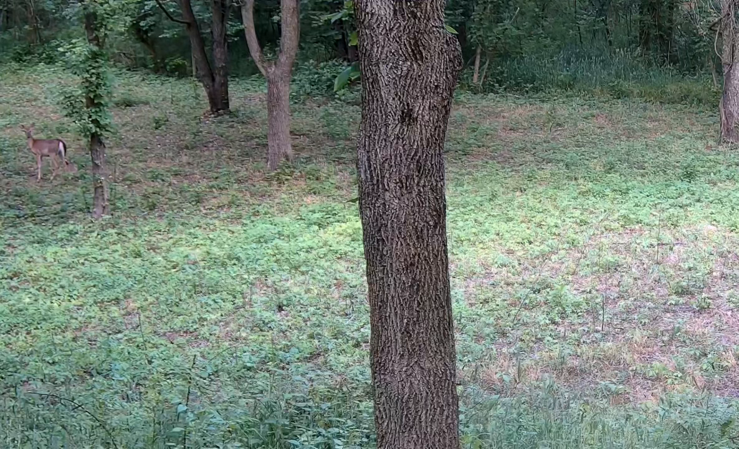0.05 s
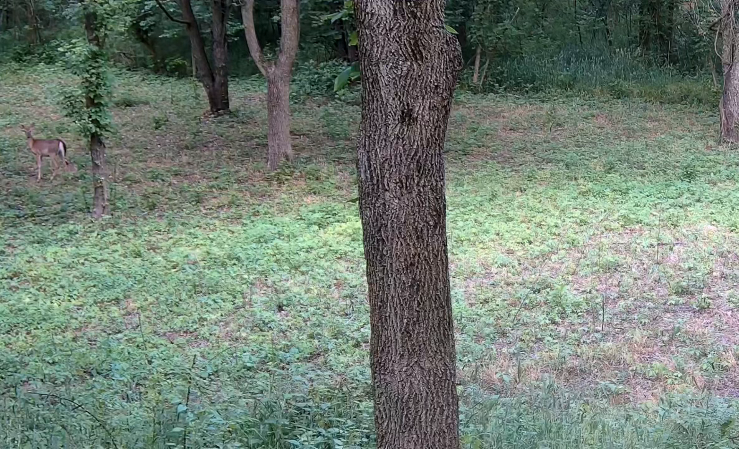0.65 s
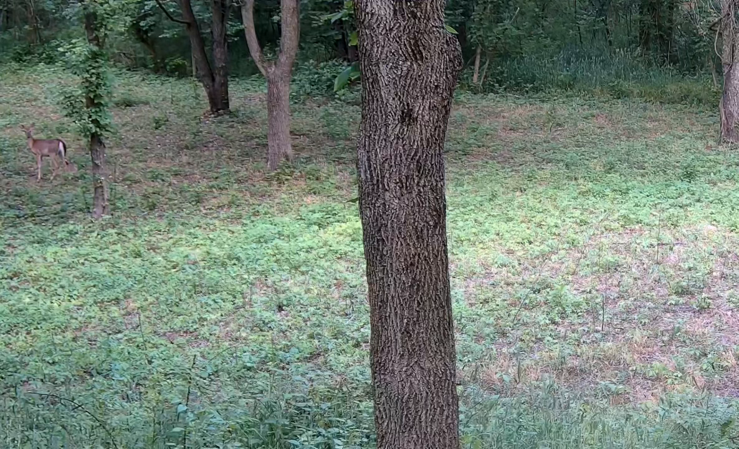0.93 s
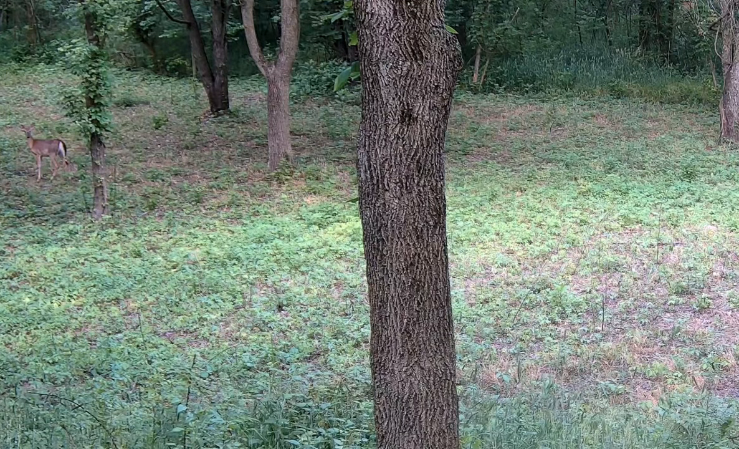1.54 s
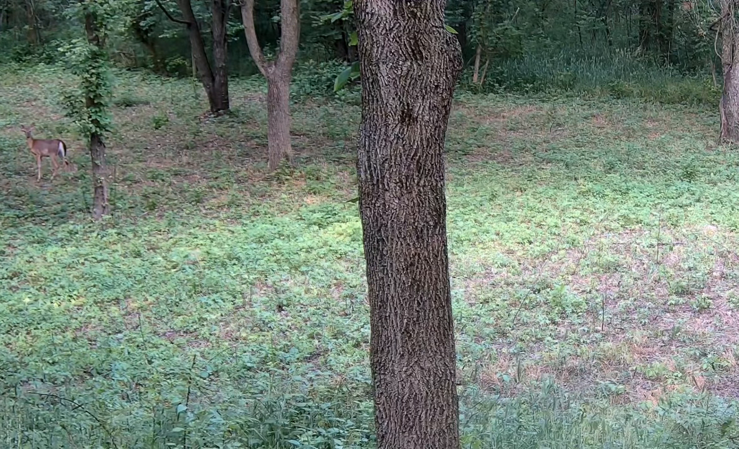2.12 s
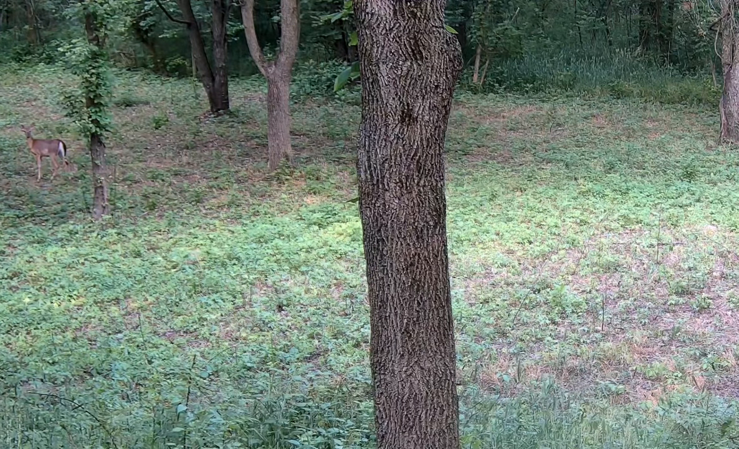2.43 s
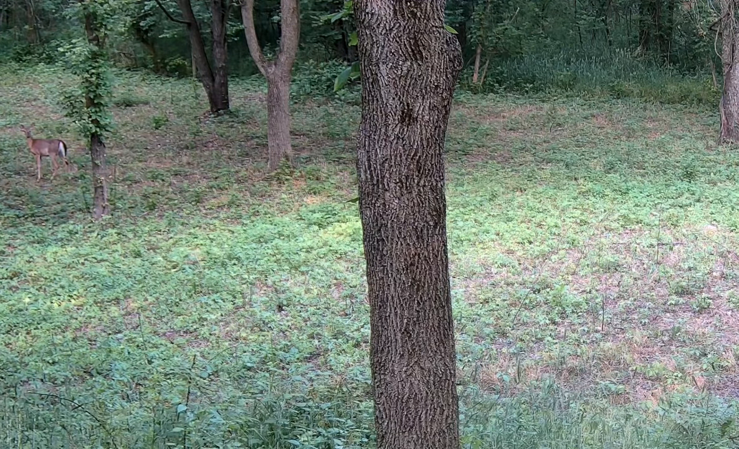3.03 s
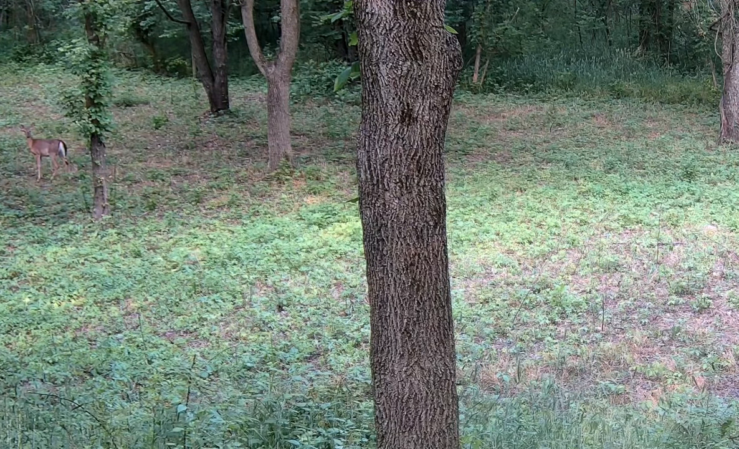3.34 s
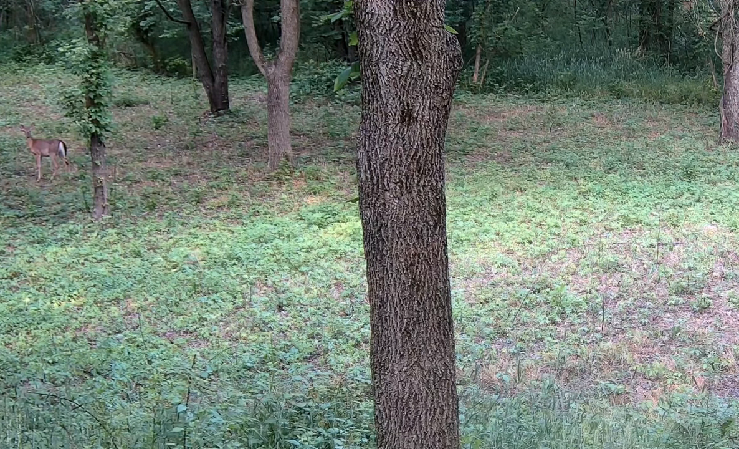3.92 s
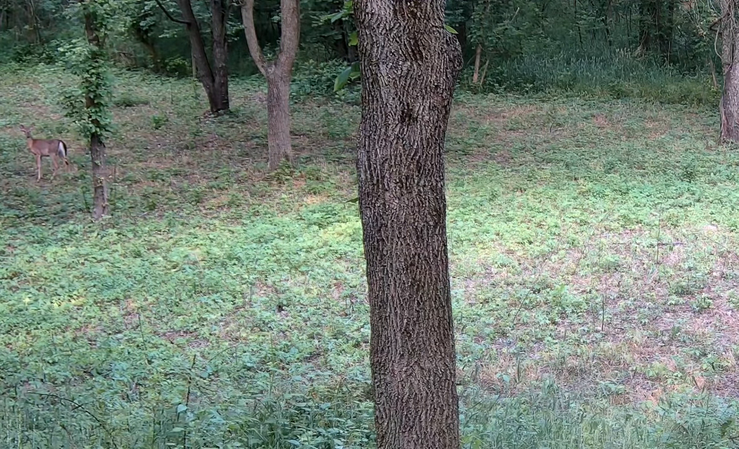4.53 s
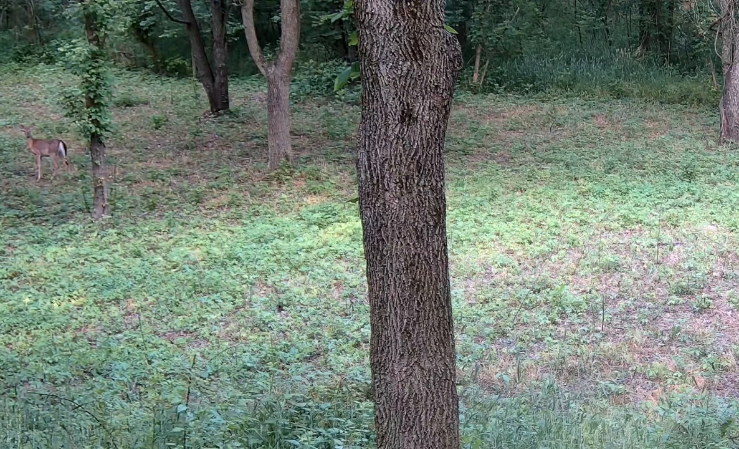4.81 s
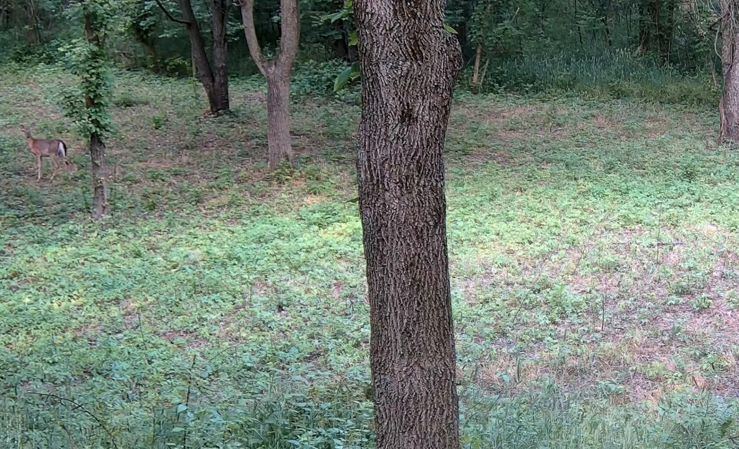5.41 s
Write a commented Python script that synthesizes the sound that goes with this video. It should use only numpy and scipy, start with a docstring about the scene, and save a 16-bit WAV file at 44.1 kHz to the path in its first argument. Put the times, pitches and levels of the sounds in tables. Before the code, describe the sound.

Two thin, nasal fawn bleats carry through quiet woods, among bird chirps, distant woodpecker drumming and a faint hum of traffic.

```python
"""A far woodpecker drums on a hollow limb; a dove coos and small birds chip and slur their notes.
Then the main voice: a fawn bleats twice across the woodland clearing, its vocal folds sounding
thin, nasal harmonics through the throat. A crow caws, and the trunks scatter every call.
Behind them are a thin trill, a stir of leaves, far machine hum and traffic, and the hiss of the woods."""
import sys
import numpy as np
from scipy import signal
from scipy.fft import rfft, irfft, next_fast_len
from scipy.io import wavfile
from scipy.ndimage import map_coordinates

SR = 44100
rng = np.random.default_rng(int(sys.argv[2]) if len(sys.argv) > 2 else 0)


def master_out(mix):
    """Clip the mix to full scale and print it as 16-bit PCM to the path in sys.argv[1]."""
    frames = np.transpose(np.atleast_2d(mix))
    ceiling = np.clip(frames, -1, 1)
    pcm = np.round(ceiling * 32767).astype(np.int16)
    wavfile.write(sys.argv[1], SR, pcm)


N = 245195


def amp(db):
    """Decibels to gain."""
    return 10 ** (np.asarray(db) / 20)


def unit(x):
    """x at rms 1."""
    return x / np.sqrt(np.mean(x ** 2) + 1e-20)


def along(points, hz):
    """Interpolate (freq_hz, value) points on a log frequency axis."""
    freqs, values = np.transpose(points)
    return np.interp(np.log(hz + 1), np.log(freqs + 1), values)


def curves(rows):
    """One per-sample curve for each column after time_s."""
    times, *columns = np.transpose(rows)
    return [np.interp(np.arange(N) / SR, times, column) for column in columns]


def gate(start_s, end_s, fade_s):
    """1 between two times, with soft edges."""
    t = np.arange(N) / SR
    inside_s = np.minimum(t - start_s, end_s - t)
    return np.sin(np.pi / 2 * np.clip(inside_s / fade_s + .5, 0, 1)) ** 2


def wobble(knots_per_s, size=N):
    """Smooth random curve."""
    knots = rng.standard_normal(int(size * knots_per_s / SR) + 4)
    return map_coordinates(knots, [np.arange(size) * knots_per_s / SR])


def phase(hz):
    """Running phase of a moving frequency."""
    return 2 * np.pi * np.cumsum(hz) / SR


def filtered(x, response):
    """Apply the gain response(hz) to x."""
    size = next_fast_len(N + SR // 2)
    return irfft(rfft(x, size) * response(np.fft.rfftfreq(size, 1 / SR)), size)[:N]


def noise(spectrum):
    """Noise of rms 1, coloured by (freq_hz, gain_db) points."""
    return unit(filtered(rng.standard_normal(N), lambda hz: amp(along(spectrum, hz))))


def add(track, start_s, sound):
    """Mix a sound into a track."""
    part = track[max(round(start_s * SR), 0):][:len(sound)]
    part += sound[:len(part)]


# nasal resonance: freq_hz, gain_db
NASAL_BAND = [(2500, -70), (3500, -35), (3690, 0), (3790, 0), (4000, -35), (6000, -70)]


def bleat(contour, throat, voice_break, full_effort_db=-47, break_length_s=.03, flutter_depth_db=3):
    """Vocal folds sound harmonics through the throat; effort brightens them, a break turns them hoarse."""
    pitch_hz, level_db, brightness_db = curves(contour)
    break_s, before, after = voice_break
    hoarse, = curves([(break_s - break_length_s / 2, before), (break_s + break_length_s / 2, after)])
    cycle = phase(pitch_hz * (1 + .008 * hoarse * wobble(420) + .003 * wobble(50)))
    slack_db = np.maximum(full_effort_db - level_db - brightness_db, 0)
    # the fundamental swells less than its overtones
    voice = amp(along(throat, pitch_hz) + .96 * (full_effort_db - level_db)) * np.sin(cycle)
    flutter = wobble(150)
    for k in range(2, 10):
        upper = min((k - 2) / 2, 1)  # overtones above the first resonance follow the brightness
        top = max(k - 5, 0)  # the highest need effort and smear most
        smear_rad = (.1 * upper + hoarse * (.3 * upper + .9 * top)) * wobble(300)
        flutter_db = flutter_depth_db * (flutter + wobble(150)) / 2
        tilt_db = upper * (brightness_db - 3 + flutter_db) - .15 * top * slack_db
        harmonic_db = along(throat, k * pitch_hz) + tilt_db + .6 * flutter
        voice += amp(harmonic_db) * np.sin(k * cycle + smear_rad)
    turbulence = noise([(2000, -36.5), (2800, -22.5), (3400, 14), (4000, -5), (5500, -1), (7000, -30.5)])
    rasp = turbulence * (1 + np.cos(cycle))  # one puff through the folds per cycle
    voice = np.sqrt(2) * voice + hoarse * amp(brightness_db - 28) * rasp
    nasal = hoarse * amp(-51 + .24 * (level_db - full_effort_db)) * noise(NASAL_BAND)
    return (voice * amp(level_db) + nasal) * gate(contour[0][0], contour[-1][0] + .0077, .022)


# voice contours: time_s, pitch_hz, level_db, brightness_db
BLEAT_1 = [(1.645, 785, -64.5, -17.5), (1.697, 807, -54, -5), (1.741, 794, -46, -1.5),
           (1.773, 732, -46.5, -5.5), (1.825, 747, -46, 1), (1.859, 730, -45, -2),
           (1.899, 770.2, -43.5, -6), (1.983, 740, -51, -4), (2.055, 673, -66, 0)]
BLEAT_2 = [(4.07, 812, -71.5, -9), (4.1, 803.7, -60, 2.5), (4.15, 779.6, -50.5, 0),
           (4.23, 778.3, -45.5, -3), (4.278, 760, -55, 7), (4.388, 778.2, -57.5, 4),
           (4.47, 789.8, -66, 3.5)]
# throat and mouth response, one list per bleat: freq_hz, gain_db
THROAT_RESPONSES = [
    [(750, -26.5), (1350, 5), (1620, -3.5), (2100, -17), (2280, -12), (2980, -15.5), (3220, 4.5),
     (3480, -11), (3780, 1.5), (4050, -29.5), (4450, -13.5), (5250, -14.5), (6000, -21.5), (6800, -41.5)],
    [(780, -27.5), (1400, 2), (1620, 4.5), (2330, -13.5), (3050, -9.5), (3250, 10), (3550, 5), (3880, 1),
     (4050, -12), (4650, -6.5), (5420, -8.5), (6200, -21.5), (6900, -46.5)],
]
# voice break, one row per bleat: time_s, hoarseness_before, hoarseness_after
VOICE_BREAKS = [(1.87, .12, .5), (4.25, .02, .09)]


def fawn():
    """Two bleats from the edge of the clearing."""
    first = bleat(BLEAT_1, THROAT_RESPONSES[0], VOICE_BREAKS[0])
    second = bleat(BLEAT_2, THROAT_RESPONSES[1], VOICE_BREAKS[1])
    return trees(first + second, wet_db=-2, near_db=7, near_t60_s=.17)


# hollow limb modes: freq_hz, gain_db, t60_s
LIMB_MODES = [(935, 0, .032), (1060, -3, .028)]


def woodpecker(blows=19, start_s=.042, gap_s=.0406, gap_growth_s=.00019, echo_s=.023):
    """Bill blows ring a hollow limb, slowing and weakening; a trunk throws each one back."""
    out, t = np.zeros(N), np.arange(SR // 8) / SR
    fresh_s, tiring_s, tired_loss_db, fade_db_per_s = .18, .041, 6, 3
    for k in range(blows):
        elapsed_s = k * gap_s + gap_growth_s * k * (k - 1) / 2
        detune, force_db = rng.normal([1, 0], [.025, 2.2])  # each blow lands a little differently
        tired = np.clip((elapsed_s - fresh_s) / tiring_s, 0, 1)
        blow_db = -45.5 - tired_loss_db * tired - fade_db_per_s * elapsed_s + force_db
        blow = sum(amp(blow_db + gain_db - 60 * t / t60_s) * np.sin(2 * np.pi * hz * detune * t)
                   for hz, gain_db, t60_s in LIMB_MODES)
        add(out, start_s + elapsed_s, blow)
        add(out, start_s + elapsed_s + echo_s, amp(-9) * blow)
    out = filtered(out, lambda hz: amp(along([(650, -22.5), (880, 2), (1120, -1.5), (1400, -17.5)], hz)))
    return trees(out, wet_db=-7.5, near_db=-3, near_t60_s=.15)


def whistle(length_s, start_hz, end_hz, level_db, buzz):
    """One slurred note, roughened by fast pitch flutter; buzz runs 0-1."""
    u = np.linspace(0, 1, int(length_s * SR))
    pitch_hz = start_hz + (end_hz - start_hz) * u + buzz * 260 * wobble(460, len(u))
    return amp(level_db) * np.abs(np.sin(np.pi * u)) ** .5 * np.sin(phase(pitch_hz))


# single notes: start_s, length_s, start_hz, end_hz, level_db, buzz
SONG_NOTES = [(0.079, 0.03, 3500, 6590, -67.5, 0.56), (0.131, 0.036, 6400, 3980, -73.5, 0.6),
              (0.578, .11, 3840, 4070, -76, 0.2), (.72, .15, 4145, 3977, -63.5, 0.32),
              (0.888, .076, 3997, 4365, -57, 0.3), (0.92, 0.074, 5180, 5170, -63, 0.7),
              (0.953, .06, 4217, 3814, -53, 0.6), (1.017, 0.068, 4000, 4000, -65.5, .3),
              (1.099, 0.12, 6180, 5250, -73.5, 1), (1.277, .13, 6180, 5100, -74.5, 1),
              (1.325, 0.022, 4720, 4980, -65.5, .1), (1.5, .15, 6020, 6170, -80.5, 0.53),
              (2.306, 0.019, 3760, 4320, -56.5, 0.7), (3.917, 0.051, 3150, 2650, -73, 0.13),
              (4.055, 0.051, 2924, 3027, -61, 0.03)]
# repeated syllable: start_s, fall_s, start_hz, level_db
SONG_SYLLABLES = [(1.386, .085, 4597, -50), (1.614, .068, 4430, -51)]


def songbirds(fall_hz=467, flick_hz=840, flick_s=.066):
    """Small birds whistle single notes; the loudest repeats a buzzy fall and a soft upward flick."""
    out = np.zeros(N)
    for start_s, *note in SONG_NOTES:
        add(out, start_s, whistle(*note))
    for start_s, fall_s, hz, level_db in SONG_SYLLABLES:
        add(out, start_s, whistle(fall_s, hz, hz - fall_hz, level_db, buzz=.6))
        add(out, start_s + fall_s, whistle(flick_s, hz, hz + flick_hz, level_db - 14.5, buzz=.6))
    return trees(out, wet_db=-2, near_db=1.5, near_t60_s=.17)


# sharp bird chips: start_s, length_s, level_db
ALARM_CHIPS = [(0.711, 0.0048, -53), (0.723, 0.0095, -51.5), (2.316, 0.0085, -54)]


def alarm_chips(low_hz=3550, high_hz=7400):
    """Each chip whips up an octave in milliseconds and lingers among the trunks."""
    out = np.zeros(N)
    for start_s, length_s, level_db in ALARM_CHIPS:
        u = np.linspace(0, 1, int(length_s * SR))
        pitch_hz = low_hz * (high_hz / low_hz) ** (u * u)
        add(out, start_s, amp(level_db) * np.abs(np.sin(np.pi * u)) ** .5 * np.sin(phase(pitch_hz)))
    return trees(out, wet_db=1, near_db=7, near_t60_s=.17)


# caws: start_s, length_s, pitch_hz, level_db
CROW_CAWS = [(1.577, 0.048, 384, -56), (1.666, 0.054, 391.5, -56.5), (1.765, 0.078, 387.7, -62)]


def crow(jitter=.03):
    """Far hoarse caws; only harmonics 2 and 3 carry."""
    out = np.zeros(N)
    for start_s, length_s, pitch_hz, level_db in CROW_CAWS:
        u = np.linspace(0, 1, int(length_s * SR))
        cycle = phase(pitch_hz * (1 + jitter * wobble(200, len(u))))
        harmonics = .45 * np.sin(2 * cycle) + np.sin(3 * cycle)
        add(out, start_s, amp(level_db) * np.sin(np.pi * u) * harmonics)
    return trees(out, wet_db=-1.5, near_db=-9.5, near_t60_s=.22)


# coos: start_s, length_s, level_db
DOVE_COOS = [(0.429, 0.074, -63), (0.584, .11, -65.5), (.72, .45, -77.5)]


def dove(held_hz=507.6, rise_hz=42.1, rise_s=.11):
    """A soft, pure phrase that slides up to a held pitch."""
    elapsed_s = np.maximum(np.arange(N) / SR - DOVE_COOS[0][0], 0)
    pitch_hz = held_hz - rise_hz * np.exp(-elapsed_s / rise_s)
    envelope = sum(amp(db) * gate(start_s, start_s + length_s, .07) for start_s, length_s, db in DOVE_COOS)
    return trees(np.sqrt(2) * envelope * np.sin(phase(pitch_hz)), wet_db=-9.5, near_db=-6.5, near_t60_s=.2)


def far_birds(count=22, start_s=2.4, end_s=5.5, centre_hz=3074):
    """Faint whistles from deep in the wood."""
    out = np.zeros(N)
    for k, (offset, pitch, slope) in enumerate(rng.uniform(-1, 1, (count, 3))):
        hz = centre_hz * np.exp(.27 * pitch)
        onset_s = start_s + (end_s - start_s) * (k + offset / 2) / count
        add(out, onset_s, whistle(.091, hz, hz * (1 + .091 * slope), level_db=-79, buzz=.25))
    return trees(out, wet_db=-1.5, near_db=-1, near_t60_s=.13)


def trill(start_hz=3354, sag_hz_per_s=29, peak_s=2.3, rise_db_per_s=3.5, fall_db_per_s=5):
    """A thin far trill, as of a tree cricket, swells unevenly and fades while its pitch sags."""
    t = np.arange(N) / SR
    level_db = -74.5 - np.maximum(rise_db_per_s * (peak_s - t), fall_db_per_s * (t - peak_s))
    flicker = amp(4 * wobble(25))
    pitch_hz = start_hz - sag_hz_per_s * t + 35 * wobble(12) + 70 * wobble(250)
    tone = unit(np.sin(phase(pitch_hz)) * flicker)
    return trees(amp(level_db) * tone, wet_db=-2.5, near_db=-1, near_t60_s=.17)


def rustle(start_s=3.53, length_s=.16, level_db=-71.5):
    """Dry leaves stir briefly."""
    envelope = amp(level_db + 2.5 * wobble(90)) * gate(start_s, start_s + length_s, .057)
    return envelope * noise([(2500, -15), (3500, 6.5), (5000, -9), (7000, -15)])


# hum partials: freq_hz, level_db
HUM_PARTIALS = [(59.8, -54.5), (119.7, -65), (221, -77.5), (239.5, -81.5)]


def machine_hum():
    """A far machine; each partial wavers in level and pitch."""
    return sum(np.sqrt(2) * amp(db + 1.52 * wobble(4.275)) * np.sin(phase(hz + .39 * wobble(2.976)))
               for hz, db in HUM_PARTIALS)


def engine(start_hz=90.1, rise_hz_per_s=4.15, start_db=-78.5, rise_db_per_s=2.5):
    """A far engine slowly gains speed and grows louder."""
    t = np.arange(N) / SR
    pitch_hz = start_hz + rise_hz_per_s * t + wobble(5.4)
    level_db = start_db + rise_db_per_s * t + wobble(5.5)
    return np.sqrt(2) * amp(level_db) * np.sin(phase(pitch_hz))


# traffic swells: peak_s, half_width_s, rise_db
ROAD_SWELLS = [(1.102, 0.32, 6), (1.691, 0.43, 6), (2.451, 0.37, 6.5), (4.424, .2, 6.5)]
# deep rumble and road noise: freq_hz, gain_db
RUMBLE_SPECTRUM = [(4, -5.5), (14, -11), (28, -5), (48, -11.5), (70, -11.5), (85, -21.5), (108, -15.5),
                   (135, -28.5), (200, -54)]
ROAD_SPECTRUM = [(60, -41.5), (140, -7), (180, -3.5), (260, -5.5), (400, -9), (700, -31.5)]


def traffic(rumble_db=-59.5, road_db=-74):
    """Traffic swells on a far road; a deep rumble partly follows it."""
    t = np.arange(N) / SR
    swell_db = sum(db * np.exp(-((t - peak_s) / half_s) ** 2) for peak_s, half_s, db in ROAD_SWELLS)
    rumble = amp(rumble_db + .68 * swell_db) * noise(RUMBLE_SPECTRUM)
    road = amp(road_db + swell_db + 1.8 * wobble(9.4)) * noise(ROAD_SPECTRUM)
    return rumble + road


# woodland noise before the low cut: freq_hz, gain_db
WOODS_SPECTRUM = [(41, -31.5), (70, 1.5), (87, -15.5), (107, -7), (128, -6), (146, -19), (168, -17.5),
                  (229, -22.5), (387, -29.5), (426, -29), (892, -26.5), (1130, -36), (2140, -40.5),
                  (3280, -34), (7270, -52), (9450, -87.5), (16000, -120)]


def woods(level_db=-67, low_cut_hz=135):
    """The low murmur of the woods and the faint hiss of leaves."""
    murmur = filtered(noise(WOODS_SPECTRUM), lambda hz: 1 / (1 + (low_cut_hz / (hz + 1)) ** 8))
    return amp(level_db + .93 * wobble(1.3)) * unit(murmur)


# chorus band: freq_hz, gain_db
CHORUS_SPECTRUM = [(2300, -50), (3000, -9.5), (3300, -0.5), (3650, -0.5), (4100, -5.5), (5000, -41.5)]


def chorus(start_db=-85, rise_db_per_s=1.83):
    """Far birds and insects merge into a thin band of noise that slowly grows."""
    t = np.arange(N) / SR
    return amp(start_db + rise_db_per_s * t + 1.8 * wobble(26)) * noise(CHORUS_SPECTRUM)


# decay of the far wood: freq_hz, t60_s
WOOD_DECAY = [(300, .7), (1500, .5), (2900, .45), (3700, .65), (4600, .42), (6500, .35)]
# colour of the scattered sound: freq_hz, gain_db
SCATTER_COLOUR = [(300, -5.5), (900, 4.5), (1500, -10), (2400, 3), (3800, 4.5), (7000, 9)]


def trees(x, wet_db, near_db, near_t60_s):
    """Near trunks scatter the sound at once, near_db above the far wood, which rings on."""
    hz, t, spectrogram = signal.stft(rng.standard_normal(SR), SR, nperseg=256)
    decay = amp(-60 * t / along(WOOD_DECAY, hz)[:, None]) + amp(near_db - 60 * t / near_t60_s)
    decay *= 1 - np.exp(-t / .0025)
    tail = signal.istft(spectrogram * decay, SR, nperseg=256)[1]
    echo = signal.fftconvolve(x, tail / np.linalg.norm(tail))[:N]
    return x + filtered(echo, lambda f: amp(wet_db + along(SCATTER_COLOUR, f)))


def scene():
    """Everything heard from one spot in the clearing, in mono."""
    birds = woodpecker() + dove() + songbirds() + alarm_chips() + crow() + far_birds()
    calls = fawn() + birds + trill()
    background = rustle() + machine_hum() + engine() + traffic() + woods() + chorus()
    return (calls + background)[None]


def record(dry):
    """Low-pass with a linear edge."""
    cutoff_hz, edge_hz = 7350, 400
    return filtered(dry[0], lambda hz: np.clip((cutoff_hz - hz) / edge_hz + .5, 0, 1))[None]


dry = scene()
out = record(dry)
master_out(out)
```